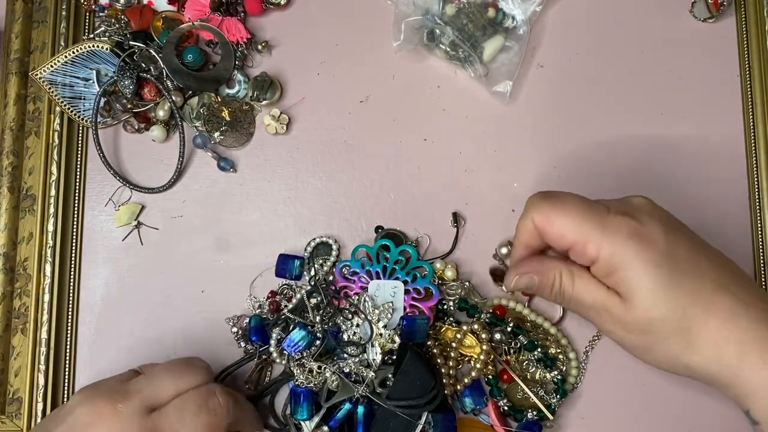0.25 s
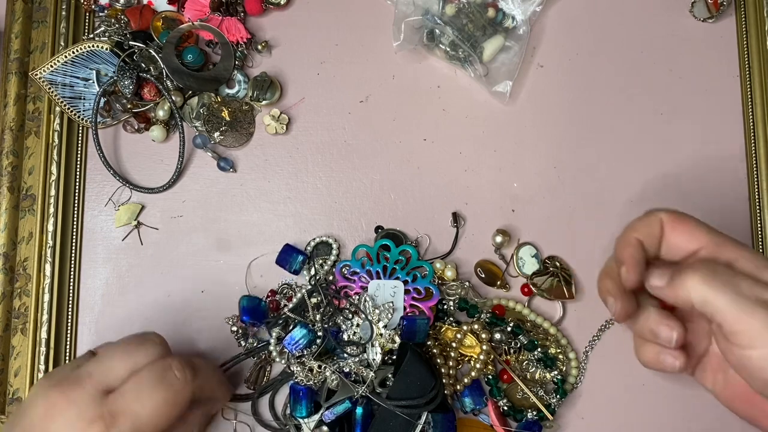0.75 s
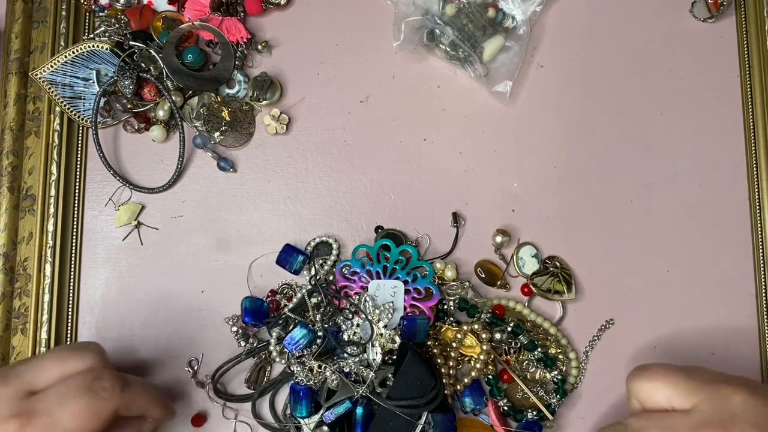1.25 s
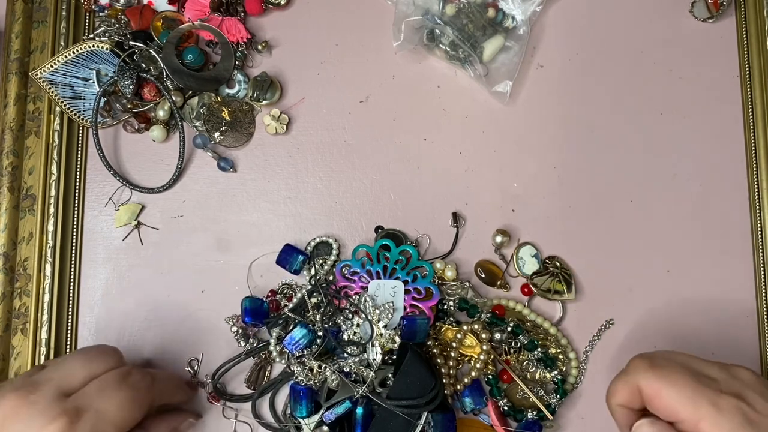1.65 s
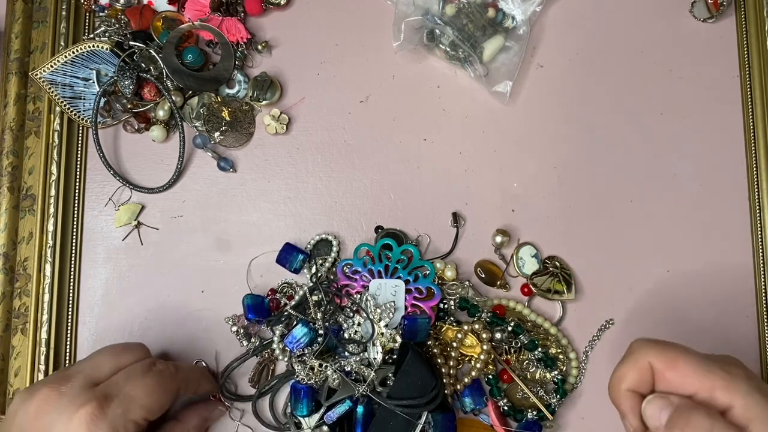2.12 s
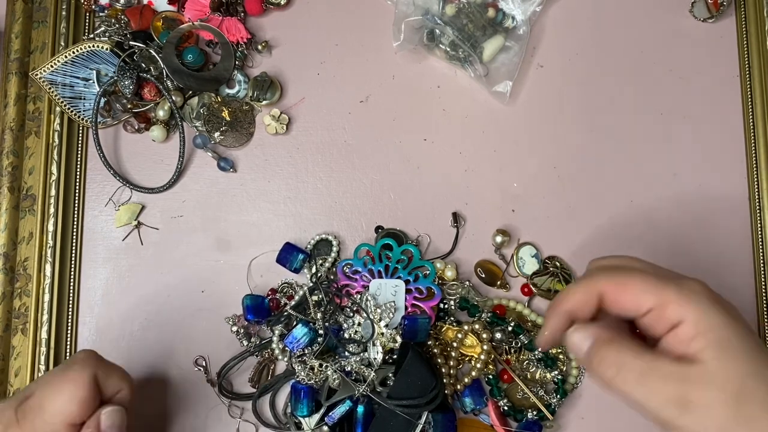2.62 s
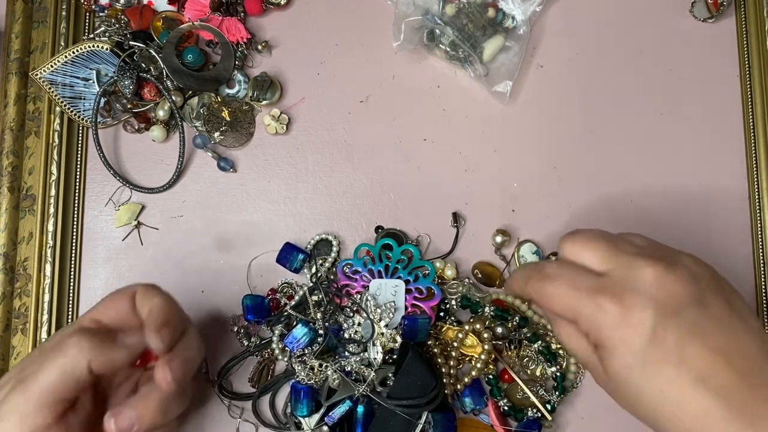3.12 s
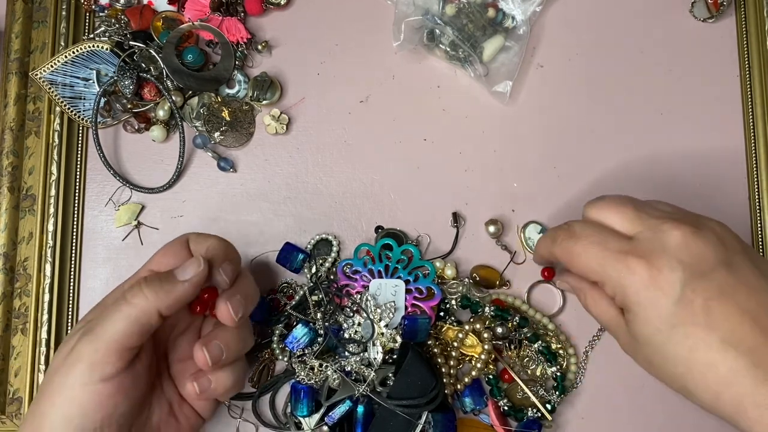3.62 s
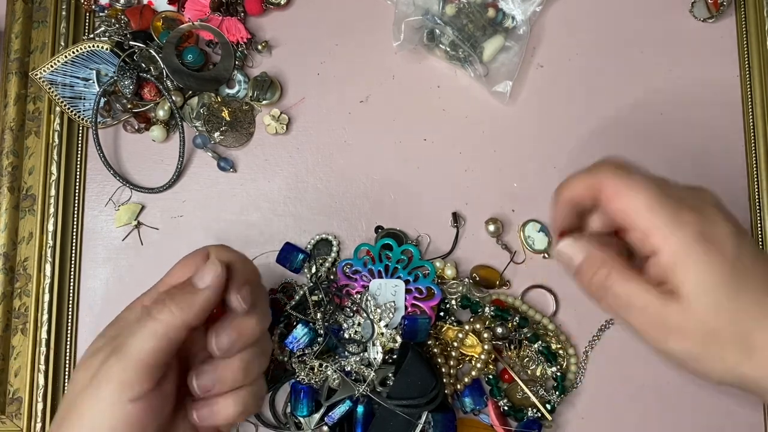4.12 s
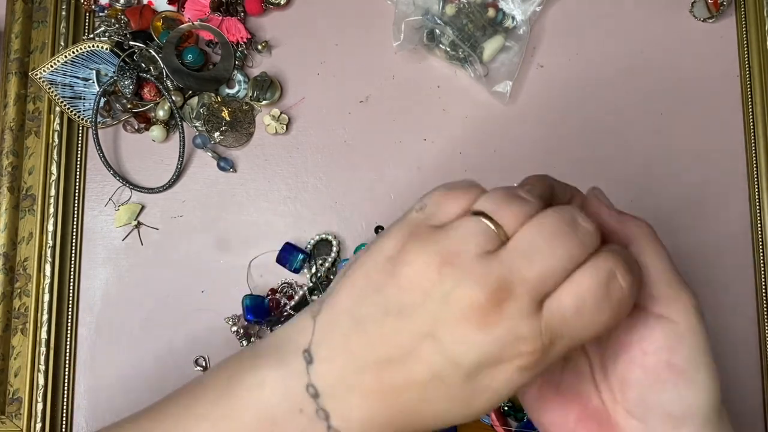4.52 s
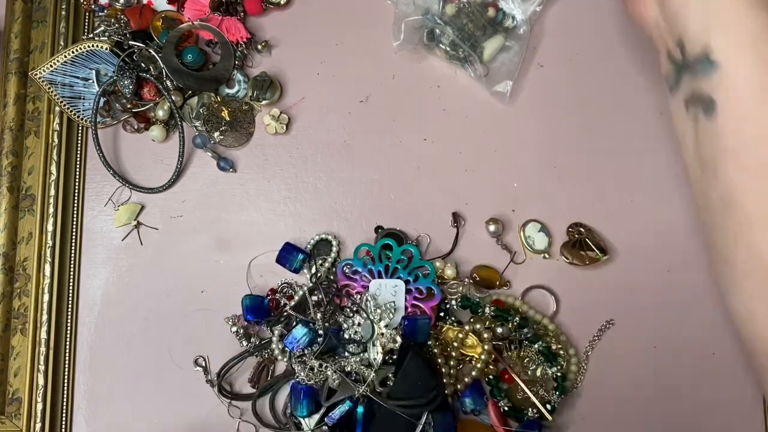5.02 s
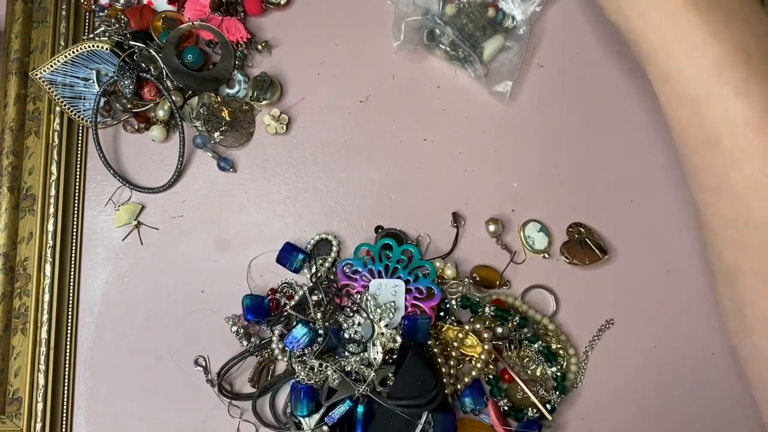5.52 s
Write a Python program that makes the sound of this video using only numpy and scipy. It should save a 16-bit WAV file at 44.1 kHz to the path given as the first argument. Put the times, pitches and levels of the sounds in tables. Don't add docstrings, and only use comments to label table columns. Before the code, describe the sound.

Small metal pieces and beads handled on a hard board, recorded close in stereo with little reverberation. Sharp knocks and chain rattle first, slightly right; quiet rustling; isolated clicks and duller thuds mid-way; a run of bright bead clicks over faint low rumble; finally a dense metallic spill that settles into scattered ticks.

```python
import sys
import numpy as np
from scipy import signal
from scipy.fft import rfft, irfft, next_fast_len
from scipy.io import wavfile

SR = 44100
rng = np.random.default_rng(int(sys.argv[2]) if len(sys.argv) > 2 else 0)


def dump_mix(stems):
    frames = np.atleast_2d(stems).T
    limited = np.clip(frames, -1, 1)
    pcm = np.round(limited * 32767).astype(np.int16)
    wavfile.write(sys.argv[1], SR, pcm)


def natural_amplitude(level_db):
    exponent = np.asarray(level_db, float) / 20
    return 10 ** exponent


N = 253559

# frequency in Hz, level in dB per Hz.
AIR_SPECTRUM = [(40, 7.5), (110, 11.5), (180, 0.5), (520, 0), (800, -19.5), (1100, -14), (2000, -19),
                (4000, -24), (6300, -27), (10000, -29.5), (14000, -42.5)]
# frequency in Hz, likeness 0-1.
AIR_LIKENESS = [(60, 1), (150, 0.2), (400, 1), (1000, 0.04), (3500, 0.1), (7000, 0)]
# time in seconds, stand level in dB.
ARM_LEAN = [
    (0.0, -71),
    (4.95, -51),
    (4.96, -42),
    (5.72, -50.5),
    (5.75, -62),
]
# time in seconds, level in dB.
FRAME_BUMPS = [(.3, -51), (1.248, -59), (2.198, -62.5), (2.551, -65), (2.751, -54.5), (3.25, -55.5),
               (3.6, -56.5), (4.248, -48.5), (4.601, -55), (4.798, -57), (5.051, -54), (5.251, -57.5),
               (5.45, -51.5), (5.6, -52)]
# time in seconds, left-right in dB, nearness to the board's middle 0-1.
HANDS = [
    (0, 2, 0.25),
    (1.0, 6, 0),
    (2.3, 5.5, 0.73),
    (2.7, 1.5, 0.84),
    (3.099, 1.5, 0.93),
    (3.7, 1, 0.8),
    (3.86, 1.5, 0.92),
    (4.2, 7, 1),
    (5.2, 3.5, 0.04),
    (5.75, 1, 0.5),
]
# frequency in Hz, width in Hz, level in dB.
EDGE_MODES = [(760, 60, 0), (960, 80, -1), (606, 60, -8), (1310, 170, -6), (2300, 600, -15)]
# frequency in Hz, width in Hz, level in dB.
MIDDLE_MODES = [(385, 48, 0), (620, 120, -7), (215, 60, -8)]
# frequency in Hz, width in Hz, level in dB.
LINK_MODES = [(3820, 230, -10), (4660, 90, 3), (6040, 140, 3), (6730, 130, -6)]
# start in seconds, hold in seconds, board, links and fine chain in dB.
SLIDES = [(.268, 0.03, -41.5, -49, -49), (.3, 0.088, -42.5, -58.5, -58), (.655, 0.085, -47.5, -48, -51),
          (.76, 0.041, -58, -66.5, -68), (.82, 0.068, -56.5, -67.5, -68.5), (1.572, .03, -68, -81.5, -88),
          (1.782, 0.029, -70.5, -70, -88), (2.33, .06, -93, -94, -87), (2.02, 0.057, -67, -76.5, -102),
          (2.185, 0.061, -60.5, -67, -81), (3.098, 0.17, -44, -63, -61),
          (3.342, 0.058, -48.5, -62.5, -65.5), (3.495, .09, -46.5, -70.5, -95),
          (4.22, 0.257, -66.5, -85, -84.5), (5.25, 0.095, -40.5, -45.5, -53.5), (5.33, .2, -54, -57.5, -55)]
# start in seconds, seconds to lose 30 dB, board, links, fine chain in dB.
SPILLS = [(.185, -0.32, -76, -72, -73), (.36, 0.27, -55, -73.5, -67), (0.929, 3, -72, -101, -105.5),
          (1.51, -0.5, -81, -88.5, -88), (1.725, 0.34, -82.5, -75.5, -93), (1.878, 0.2, -83.5, -77, -86),
          (2.059, 0.2, -71.5, -66, -94), (2.488, 0.18, -88, -74, -66), (2.736, 0.1276, -44.5, -49.5, -47.5),
          (3.207, 0.088, -33, -59, -62), (3.586, 0.06, -40.5, -65.5, -88),
          (3.868, 0.53, -56, -102.5, -76.5), (4.139, 0, -82.5, -80, -72), (4.398, 2, -85, -82, -76.5),
          (4.438, -0.15, -79, -93, -63), (4.496, -1.02, -62, -87, -62.5), (4.561, 0.18, -64, -80.5, -60),
          (4.635, 0.3, -94, -88, -65), (4.713, 0.1, -74, -96.5, -70), (4.865, 0.5, -97, -71, -74),
          (5.215, 0.58, -65, -65.5, -49.5), (5.566, 0.12, -49, -54.5, -65), (5.735, 3, -50, -62, -74)]
# start in seconds, hold in seconds, level in dB.
RUBS = [(.185, 0.0048, -53.5), (.3, 0.079, -51), (.47, 0.32, -78.5), (.655, 0.082, -47.5),
        (.77, 0.13, -58.5), (.9, 0.023, -69.5), (.95, 0.145, -76.5), (1.2, 0.079, -82.5),
        (1.51, 0.088, -80), (1.79, 0.008, -67), (2.18, 0.052, -71), (2.74, 0.06, -59.5),
        (3.19, 0.0072, -53.5), (3.345, 0.029, -76), (3.51, 0.047, -84), (3.865, 0.046, -70.5),
        (4.12, 0.097, -80), (4.22, .19, -71), (4.54, 0.079, -73), (5.225, 0.033, -54.5),
        (5.285, 0.036, -39), (5.34, 0.17, -52), (5.541, 0.057, -48.5)]
# board, links, fine chain and skin levels in dB.
IDLE_DB = [-84, -93.5, -100, -91.5]
# time in seconds, tick peak in dB, knock in dB over tick,
# treble share in dB.
EDGE_TOUCHES = [(0.169, -36, 2.5, -15), (0.234, -31, -4, -12.5), (0.2653, -24.5, -4, 6),
                (0.2754, -16, -19.5, -5.5), (0.2882, -25, -1.5, -27.5), (0.3378, -26, -7, -21.5),
                (0.6533, -20, -12.5, -24), (0.6677, -30, -12, -18), (0.698, -32, -13.5, -20.5),
                (0.7339, -37, -3, -27), (0.807, -24.5, -32, -18), (1.5738, -78, 16, -9),
                (2.7255, -29, -22.5, -7.5), (3.0881, -53, -2, -4.5), (3.8568, -56, 3.5, -29),
                (3.8847, -55.5, 3, -8)]
# time in seconds, tick peak in dB, knock in dB over tick,
# treble share in dB.
MIDDLE_TOUCHES = [(1.2142, -55.5, -5.5, -22.5), (1.725, -54.5, -10.5, -24.5), (1.783, -51, -7.5, -22),
                  (2.055, -52.5, -13.5, -19), (2.1874, -58.5, -1, -24), (2.7816, -26, -19.5, 15.5),
                  (3.104, -28.5, -19, -8), (3.1214, -30.5, -14.5, -58), (3.1653, -35.5, -13.5, -10.5),
                  (3.1972, -31.5, -3.5, -55), (3.337, -45.5, -40, -6.5), (3.3741, -52.5, -2.5, -19),
                  (3.558, -76, 0, -26), (5.5949, -43.5, -5, -18.5), (5.725, -39.5, -22, -6.5)]
# time in seconds, tick peak in dB, knock in dB over tick,
# treble share in dB, knock pitch in Hz.
DISH_TOUCHES = [(5.2124, -36.5, -18.5, -8, 1393), (5.235, -46, 1, -9.5, 1460),
                (5.2577, -17, -33.5, -7.5, 2020), (5.2881, -18, -22, -13, 2080),
                (5.327, -18.5, -25, -11.5, 1884), (5.3609, -25.5, -12.5, -4, 2143),
                (5.374, -27, -43, -10, 1390), (5.416, -22.5, -3.5, -8.5, 1440), (5.4888, -42, -4, 6, 1620),
                (5.5441, -20, -6, -13, 1488), (5.6305, -42, -11.5, -10, 2140),
                (5.645, -38.5, -10, -10.5, 1550), (5.693, -42, -5, -19, 1610),
                (5.7315, -30.5, -2.5, 3, 1360)]
# time in seconds, peak in dB, pitch in Hz.
EDGE_TAPS = [(0.2649, -16.5, 918), (0.268, -27.5, 914), (0.2763, -25.5, 878.4), (0.2859, -20, 970),
             (0.2896, -26.5, 934), (0.3071, -39, 1021), (0.3121, -42.5, 924), (0.3177, -37.5, 1450),
             (0.3224, -45.5, 1110), (0.3333, -40, 1090), (0.3382, -22.5, 1031), (0.3414, -33.5, 1142),
             (0.3528, -42, 1010), (0.3587, -50, 1020), (0.3619, -49.5, 1240), (0.3653, -49.5, 1240),
             (0.3769, -50, 900), (0.3832, -59, 1030), (0.3973, -55, 1230), (0.4014, -53.5, 1436),
             (0.6501, -28, 980), (0.6539, -25.5, 1490), (0.6612, -37.5, 980), (0.6657, -48.5, 960),
             (0.6694, -29, 1322), (0.677, -42.5, 940), (0.6899, -33.5, 867), (0.6984, -43, 929),
             (0.7168, -34.5, 977), (0.7204, -51, 1410), (0.7368, -49, 1300), (0.7452, -48, 1140),
             (0.7535, -41.5, 980), (0.7665, -47.5, 950), (0.7835, -44.5, 1050)]
# time in seconds, peak in dB, pitch in Hz.
MIDDLE_TAPS = [(2.7324, -52, 1230), (2.7377, -47.5, 937), (2.7809, -61, 1240), (3.1017, -44, 1056),
               (3.1258, -34, 866), (3.1314, -45, 1080), (3.1415, -41, 990), (3.1671, -40, 1040),
               (3.1707, -45, 1030), (3.1784, -38, 1130), (3.1882, -38.5, 845), (3.198, -29, 1090),
               (3.2123, -50, 830), (3.3413, -56, 910), (3.3564, -50, 1095), (3.3675, -52, 867),
               (3.3761, -41, 1009), (3.388, -46, 890), (3.4905, -52, 740), (3.5084, -47.5, 770),
               (3.526, -48.5, 836), (3.5666, -55.5, 890), (3.5802, -42, 710), (3.611, -52.5, 960),
               (3.614, -49, 990), (3.8574, -53, 1116), (3.886, -58.5, 1110), (3.907, -52.5, 804)]
# time in seconds, peak in dB, pitch in Hz.
DISH_TAPS = [(5.2193, -36.5, 1520), (5.2363, -37, 1540), (5.2405, -47, 1760), (5.2539, -41, 1640),
             (5.2603, -42, 1860), (5.2724, -26.5, 1530), (5.2908, -33, 1870), (5.2979, -29.5, 1560),
             (5.3031, -37, 1430), (5.3084, -35, 1600), (5.3123, -27.5, 1340), (5.3173, -53, 1400),
             (5.3264, -44, 1490), (5.3398, -46, 1380), (5.3603, -39, 1980), (5.3644, -38, 1560),
             (5.3732, -46, 1800), (5.3836, -44, 1910), (5.3947, -41, 1680), (5.4164, -20, 1580),
             (5.4375, -40, 1860), (5.4598, -43, 1470), (5.4655, -46, 1520), (5.4713, -43, 1830),
             (5.4755, -46, 1590), (5.4927, -40, 1610), (5.507, -49, 1870), (5.5139, -45, 1540),
             (5.5373, -37, 1920), (5.5464, -20.5, 1560), (5.5564, -35, 1820), (5.595, -28.5, 1960),
             (5.6012, -53, 1430), (5.6519, -48.5, 1680), (5.6942, -58, 2030), (5.698, -43.5, 1680),
             (5.7318, -33, 1430)]
# time in seconds, peak in dB, pitch in Hz.
AFTER_TAPS = [
    (.2925, -24, 800),
    (.2712, -32.5, 607.6),
    (3.2345, -36, 395),
    (5.309, -38, 370),
    (5.4195, -33.5, 760),
    (5.549, -27.5, 730),
    (5.734, -45, 814),
]
# time in seconds, peak in dB, frequency in Hz, fade in seconds.
CHIRPS = [
    (.441, -58.5, 8730, 0.0057),
    (2.79, -53.5, 5430, 0.018),
    (3.496, -55, 10100, 0.0048),
    (3.497, -41.5, 8660, 0.0083),
    (3.507, -55, 8130, 0.0081),
    (4.568, -45.5, 3610, 0.0055),
    (4.624, -57, 1560, 0.0054),
]
# time in seconds, peak in dB, body in dB over the click.
PICKED_BEADS = [(0.478, -42, -28.5), (0.615, -65, 3), (2.4506, -51, -20.5), (2.4815, -25.5, -24),
                (2.541, -49, -22.5), (2.5774, -63, -4.5), (2.584, -38, -45), (2.848, -37, -15.5),
                (2.8879, -51, -5), (3.254, -36, -16), (3.2774, -45.5, -20.5), (3.933, -45, -25)]
# time in seconds, peak in dB, body in dB over the click.
POURED_BEADS = [(4.0946, -50.5, -21), (4.1235, -35, -25), (4.2401, -50, -28), (4.3415, -40, -28),
                (4.3782, -28, -21), (4.3871, -48, -18), (4.4235, -38.5, -24), (4.4717, -42, -21),
                (4.4854, -37.5, -13.5), (4.5235, -37, -17), (4.5555, -25.5, -15.5), (4.5657, -30.5, -11),
                (4.5854, -29, -14.5), (4.6101, -35, -17), (4.6225, -27.5, -22), (4.6364, -30.5, -34),
                (4.712, -29.5, -24.5), (4.7408, -35, -18.5), (4.8, -54, -23), (4.8366, -35, -17.5),
                (4.853, -35.5, -11), (4.8571, -25, -39.5), (4.9058, -45, -14), (4.9198, -32.5, -22.5),
                (5.0941, -43.5, -34), (5.1687, -40.5, -20), (5.1865, -42, -15.5)]
# time in seconds, peak in dB, colour in Hz.
NUDGES = [(4.3912, -52, 14000), (4.43, -38, 10200), (4.4342, -42, 10700), (4.4403, -45, 9980),
          (4.4808, -37.5, 12000), (4.4913, -42, 10900), (4.504, -44, 10900), (4.5502, -41, 13700),
          (4.569, -27, 13700), (4.577, -49, 13100), (4.5897, -48, 11600), (4.6036, -49, 12000),
          (4.626, -42, 11000), (4.6527, -36.5, 11300), (4.6864, -49, 10000), (4.72, -40, 13400),
          (4.7444, -40, 12600), (4.7537, -44.5, 13300), (4.7745, -51.5, 13900), (4.8405, -27, 10550),
          (4.878, -40, 13100), (4.9159, -33.5, 12800), (4.9245, -36, 10200), (4.3788, -25.5, 14660),
          (4.6224, -22.5, 14370), (4.7113, -29.5, 14430), (5.212, -35, 10000), (5.2518, -26.5, 9510)]
# time in seconds, peak in dB, colour in Hz.
CATCHES = [(.6555, -23.5, 5900), (0.67, -30, 6000), (.686, -36.5, 5830), (.696, -36, 6500),
           (0.7007, -35, 5000), (.709, -31.5, 4780), (.718, -35, 6600), (.728, -37, 5200),
           (0.735, -36.5, 5960), (0.8102, -39, 2800), (.825, -39.5, 5200), (1.695, -63, 3600),
           (5.549, -26.5, 2900), (5.418, -32.5, 2780)]
# frequency in Hz, level in dB, T60 in seconds.
TRINKET_MODES = [(1311, -4, .06), (1466, -1, .07), (2017, 1, .16), (2772, -6, .08), (3200, -8, .04),
                 (3730, -8, .07), (5450, -14, .03), (6190, -3, .05), (9155, -3, .04), (14805, -4, .07),
                 (12400, -5, .04)]
# time in seconds, level in dB.
JINGLE = [
    (5.249, -54.5),
    (5.253, -26.5),
    (5.275, -43),
    (5.29, -33.5),
    (5.31, -31),
    (5.333, -46.5),
    (5.345, -53),
    (5.41, -49),
    (5.43, -59),
]
# frequency in Hz, gain in dB.
CAPSULE = [(5000, -0.5), (7400, -1.5), (9500, 2), (12300, -4.5), (14500, -1), (15500, -2), (15950, -6.5),
           (16600, -19)]

AIR_DB, ROOM_DB, ROOM_T60_S, WALL_CUT_HZ = -70, -17, 0.22, 2600
STAND_HZ, STAND_WIDTH_HZ = 53, 3.6
BUMP_RISE_S, BUMP_FADE_S, FRAME_REST_DB = 0.26, 0.26, -70
GRIP_S, DROP_S, STOP_S, LIFT_S = 0.018, 0.019, 0.012, 0.068
EDGE_HZ, EDGE_SPREAD, MIDDLE_HZ = 910, 0.37, 350
NUDGE_FADE_S, NUDGE_SPREAD = 0.00082, 1.45
BOUNCE_START_S, FIRST_GAP_S, GAP_RATIO = 0.8295, 0.0195, 0.835
BOUNCE_DB, BOUNCE_LOSS_DB = -45, 2
PORT_LAG_S, PORT_FROM_HZ, BASS_LEAD_RAD, CUTOFF_HZ = 0.000258, 6360, 0.5, 17400


def rms_one(x):
    return x / np.sqrt(np.mean(x ** 2) + 1e-20)


def peak_one(x):
    return x / np.max(np.abs(x))


def in_time(rows):
    s, *columns = np.transpose(rows)
    return [np.interp(np.arange(N) / SR, s, c) for c in columns]


def at_hz(points, hz):
    points_hz, values = np.transpose(points)
    return np.interp(np.log(hz), np.log(points_hz), values)


def band(x, low_hz, high_hz):
    sos = signal.butter(2, [low_hz, min(high_hz, 0.45 * SR)], "band", fs=SR, output="sos")
    return signal.sosfilt(sos, x)


def resonate(x, hz, width_hz):
    r = np.exp(-np.pi * width_hz / SR)
    poles = [1, -2 * r * np.cos(2 * np.pi * hz / SR), r * r]
    return signal.lfilter([(1 - r * r) / 2, 0, (r * r - 1) / 2], poles, x)


def body_of(x, modes):
    total = 0
    for k, (hz, width_hz, db) in enumerate(modes):
        total = total + (-1) ** k * natural_amplitude(db) * rms_one(resonate(x, hz, width_hz))
    return rms_one(total)


def add_at(out, s, sound):
    at = round(s * SR)
    out[..., at:at + sound.shape[-1]] += sound


def place(x, pan_db, lag_s=0.0):
    sos = signal.butter(3, [350, 5600], "band", fs=SR, output="sos")
    body = signal.sosfiltfilt(sos, x)
    n = np.arange(len(x))
    late = np.interp(n - lag_s * SR, n, body, left=0)
    left = x + body * (natural_amplitude(pan_db / 2) - 1)
    right = x - body + late * natural_amplitude(-pan_db / 2)
    return np.array([left, right])


def swells(rows, rise_s, fall_s):
    t, rows = np.arange(0, N + 32, 32) / SR, np.array(rows, float)
    start, hold = rows[:, :1], np.maximum(rows[:, 1:2], 0)
    fall_s = np.maximum(np.reshape(fall_s, (-1, 1)), 0.01)
    before, after = (start - t) / rise_s, (t - start - hold) / fall_s
    shape = natural_amplitude(-30 * np.maximum(np.maximum(before, after), 0))
    power = natural_amplitude(rows[:, 2:].T) ** 2 @ shape ** 2
    return np.array([np.interp(np.arange(N) / SR, t, np.sqrt(p)) for p in power])


def air():
    out, edges_hz, white = 0, 30 * 2 ** np.arange(0, 9.6, 0.5), rng.standard_normal((2, 2, N))
    for k, (low_hz, high_hz) in enumerate(zip(edges_hz, edges_hz[1:])):
        mid, side = band(white[k % 2], low_hz, high_hz)
        hz = np.sqrt(low_hz * high_hz)
        alike = np.clip(at_hz(AIR_LIKENESS, hz), -1, 1)
        pair = np.sqrt(1 + alike) * mid + np.sqrt(1 - alike) * side * [[1], [-1]]
        out = out + natural_amplitude(at_hz(AIR_SPECTRUM, hz)) * pair
    return natural_amplitude(AIR_DB) * rms_one(out)


def stand():
    level_db, = in_time(ARM_LEAN)
    push = rng.standard_normal(N)
    hum = rms_one(resonate(push, STAND_HZ, STAND_WIDTH_HZ)) + 0.5 * rms_one(band(push, 40, 50))
    hum = signal.sosfilt(signal.butter(2, 80, fs=SR, output="sos"), hum)
    return natural_amplitude(level_db) * rms_one(hum)


def frame():
    bumps, = swells([(s, 0, db) for s, db in FRAME_BUMPS], BUMP_RISE_S, BUMP_FADE_S)
    rumble = band(band(rng.standard_normal(N), 73, 130), 32, 500)
    return np.hypot(bumps, natural_amplitude(FRAME_REST_DB)) * rms_one(rumble)


def moves():
    spills = np.array(SPILLS)
    slid = swells(SLIDES, GRIP_S, STOP_S)
    spilt = swells(spills * [1, 0, 1, 1, 1], DROP_S, spills[:, 1])
    rubbed = swells(RUBS, GRIP_S, LIFT_S)
    return np.hypot(np.vstack([np.hypot(slid, spilt), rubbed]), natural_amplitude(np.array(IDLE_DB))[:, None])


def grains(per_s, spread_db):
    sizes = natural_amplitude(spread_db * np.minimum(rng.exponential(1, N), 4)) * rng.choice([-1, 1], N)
    return sizes * (rng.random(N) < per_s / SR) + 0.076 * rng.standard_normal(N)


def drag(spread):
    on_board, on_links, on_chain, on_skin = moves()
    pan_db, middle = in_time(HANDS)
    middle = np.clip(middle, 0, 1)
    lumps = natural_amplitude(2.8 * rms_one(band(rng.standard_normal(N), 25, 110)))
    bright = np.clip(on_skin / natural_amplitude(-62), middle, 1)
    parts = []
    for central in (True, False):
        slips = lumps * grains(per_s=1200, spread_db=0.5)
        fine = lumps * grains(per_s=2300, spread_db=2)
        skin = rms_one(slips) + 0.7 * rng.standard_normal(N)
        board = np.sqrt(1 - middle) * body_of(slips, EDGE_MODES)
        if central:
            board = board + np.sqrt(middle) * body_of(slips, MIDDLE_MODES)
        brush = rms_one(band(skin, 1250, 2300))
        brush = brush + (1.4 - bright) * rms_one(resonate(slips, 1520, 90))
        brush = brush + bright * rms_one(band(skin, 2200, 3800))
        links = rms_one(band(fine, 4900, 8600)) + 0.13 * body_of(fine, LINK_MODES)
        sound = on_board * natural_amplitude(-7.5) * board + on_skin * natural_amplitude(-3) * rms_one(brush)
        parts.append(sound + on_links * natural_amplitude(-2.5) * rms_one(links))
    rattle = on_chain * natural_amplitude(2.5) * rms_one(band(fine, 6400, 20000))
    side = band(band(parts[1], 300, 6000), 200, 7000)
    return place(parts[0], pan_db) + rattle + spread * side * [[1], [-1]]


def touches():
    edge_hz = EDGE_HZ * np.exp(EDGE_SPREAD * rng.standard_normal(len(EDGE_TOUCHES)))
    rows = [(*r, hz) for r, hz in zip(EDGE_TOUCHES, edge_hz)]
    rows = rows + [(*r, MIDDLE_HZ) for r in MIDDLE_TOUCHES] + DISH_TOUCHES
    s, pan_db, _ = np.transpose(HANDS)
    return [(*r, np.interp(r[0], s, pan_db) + 0.5) for r in rows]


def contacts(chatter_s, knock_cycles):
    out, size = np.zeros((2, N + 4096)), 4096
    t = np.arange(size) / SR
    for s, tick_db, knock_db, treble_db, knock_hz, pan_db in touches():
        noise = rng.standard_normal(size)
        chatter = noise * (np.exp(-t / chatter_s) + 0.17 * np.exp(-t / 0.0071))
        share = min(natural_amplitude(treble_db + 5.5), 1)
        lower = band(chatter * np.exp(-t / 0.018), 4200, 9800)
        tick = share * band(chatter, 7200, 17000) + 0.34 * np.sqrt(1.03 - share ** 2) * lower
        blow = noise * noise[::-1] * np.exp(-t / 0.0066)
        knock = resonate(blow, knock_hz, knock_hz / knock_cycles) + 0.43 * band(blow, 210, 1500)
        hit = natural_amplitude(tick_db) * (peak_one(tick) + natural_amplitude(knock_db + 5) * peak_one(knock))
        add_at(out, s, place(hit, pan_db, lag_s=0.000012 * abs(pan_db)))
    return out[:, :N]


def taps(rows, cycles, thud_hz, thud_db, boost_db, glide=0.64, lag_s=0.000091):
    out, t = np.zeros(N + 1024), np.arange(1024) / SR
    thud = np.sin(2 * np.pi * thud_hz * t) * thud_hz * t * np.exp(1 - thud_hz * t)
    for s, db, hz in rows:
        age = hz * t / cycles
        turns = cycles * ((1 - glide / 2) * age + glide * (1 - np.exp(-age)))
        ring = np.sin(2 * np.pi * turns) * np.sqrt(age) * np.exp(0.5 - age)
        add_at(out, s, natural_amplitude(db + boost_db) * (ring + natural_amplitude(thud_db) * thud))
    return place(out[:N], 1.5, lag_s)


def chirps():
    t, out = np.arange(N) / SR, np.zeros(N)
    for s, peak_db, hz, fade_s in CHIRPS:
        age = np.maximum(t - s, 0)
        out += natural_amplitude(peak_db) * np.sin(2 * np.pi * hz * age) * np.exp(-age / np.clip(fade_s, 0.002, 0.016))
    return out


def beads(click_s, rattle_s):
    out, size = np.zeros((2, N + 2048)), 2048
    t = np.arange(size) / SR
    for s, click_db, body_db in PICKED_BEADS + POURED_BEADS:
        noise = rng.standard_normal(size)
        snap = noise * (np.exp(-t / click_s) + 0.49 * np.abs(noise[::-1]) * np.exp(-t / rattle_s))
        snap[0] += 6
        snap = snap + 0.2 * np.roll(noise, 700) * np.abs(snap) * [[1], [-1]]
        click = band(band(snap, 9000, 16000), 4600, 21000)
        body = band(band(snap * np.exp(-t / 0.014), 2800, 7500), 1300, 17000)
        add_at(out, s, natural_amplitude(click_db + 2.5) * (peak_one(click) + natural_amplitude(body_db + 5) * peak_one(body)))
    return out[:, :N]


def nudges():
    out, t = np.zeros(N + 1024), np.arange(1024) / SR
    for s, db, hz in NUDGES + CATCHES:
        spread = NUDGE_SPREAD ** min(hz / 9000, 1)
        scratch = rng.standard_normal(1024) * np.exp(-t / NUDGE_FADE_S)
        add_at(out, s, natural_amplitude(db) * peak_one(band(scratch, hz / spread, hz * spread)))
    return out[:N]


def bounce(count=10):
    k, clicks, out = np.arange(count), np.full(N, 1e-18), 0
    s = BOUNCE_START_S + FIRST_GAP_S * (1 - GAP_RATIO ** k) / (1 - GAP_RATIO)
    clicks[(s * SR).astype(int)] = natural_amplitude(BOUNCE_DB - BOUNCE_LOSS_DB * k)
    clicks = band(clicks, 260, 3500)
    for hz, width_hz, db in [(760, 250, 1.5), (1680, 290, -2), (3000, 730, -12)]:
        out = out + SR / np.pi / width_hz * natural_amplitude(db) * resonate(clicks, hz, width_hz)
    return out


def jingle():
    t, (level_db,), out = np.arange(N) / SR, in_time(JINGLE), np.zeros(N)
    shaken = natural_amplitude(level_db) * (t > JINGLE[0][0]) * (t < JINGLE[-1][0])
    for hz, db, t60_s in TRINKET_MODES:
        width_hz = np.log(1000) / np.pi / t60_s
        clicks = rms_one(grains(per_s=500, spread_db=3))
        ring = resonate(shaken * clicks + 1e-18, hz, width_hz)
        out += natural_amplitude(db - 9.5) * np.sqrt(SR / np.pi / width_hz) * ring
    return out


def room(x):
    size = next_fast_len(N + SR)
    w, heard, sides = 2 * np.pi * np.arange(size // 2 + 1) / size, rfft(x, size), []
    wall = 1 / (1 + 1j * w * SR / (2 * np.pi * WALL_CUT_HZ))
    for lags in rng.uniform(0.0025, 0.029, (2, 8)) * SR:
        echoes = 0
        for k, lag in enumerate(lags):
            one_round = natural_amplitude(-60 * lag / SR / ROOM_T60_S) * wall * np.exp(-1j * w * lag)
            echoes = echoes + (-1) ** k * one_round / (1 - one_round)
        sides.append(heard * echoes)
    apart = 1 / (1 + (w * SR / (2 * np.pi * PORT_FROM_HZ)) ** 8)
    return irfft([sides[0], apart * sides[1] + (1 - apart) * sides[0]], size)[:, :N]


def scene():
    table = drag(spread=0.76) + contacts(chatter_s=0.0054, knock_cycles=1.4)
    table = table + taps(EDGE_TAPS, cycles=0.98, thud_hz=410.6, thud_db=-19, boost_db=2.5)
    table = table + taps(MIDDLE_TAPS, cycles=0.71, thud_hz=382, thud_db=-11, boost_db=5)
    table = table + taps(DISH_TAPS, cycles=1.54, thud_hz=370, thud_db=-15.5, boost_db=-1)
    table = table + taps(AFTER_TAPS, cycles=2.4, thud_hz=384, thud_db=-19, boost_db=-3.5, glide=0.19)
    table = table + beads(click_s=0.00069, rattle_s=0.0099) + nudges()
    table = table + place(bounce(), 3.5) + place(chirps() + jingle(), 2)
    return table + natural_amplitude(ROOM_DB) * room(table.mean(axis=0)) + stand() + frame() + air()


def top_cut(x):
    return signal.sosfilt(signal.butter(12, 16820, fs=SR, output="sos"), x)


def record(dry):
    size = next_fast_len(N + 4096)
    hz = np.arange(size // 2 + 1) * SR / size
    lead_rad = BASS_LEAD_RAD * np.minimum(hz / 700, 1) * (hz < PORT_FROM_HZ)
    lead_rad = lead_rad - 2 * np.pi * PORT_LAG_S * np.maximum(hz - PORT_FROM_HZ, 0)
    response = natural_amplitude(at_hz(CAPSULE, hz + 1)) * np.exp(0.5j * lead_rad * [[1], [-1]])
    ports = irfft(rfft(dry, size) * response, size)[:, :N]
    mix = signal.sosfilt(signal.cheby2(8, 50, CUTOFF_HZ, fs=SR, output="sos"), ports)
    return top_cut(mix)


dry = scene()
out = record(dry)
dump_mix(out)
```